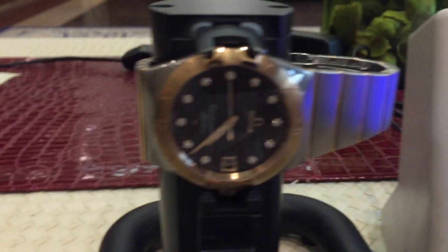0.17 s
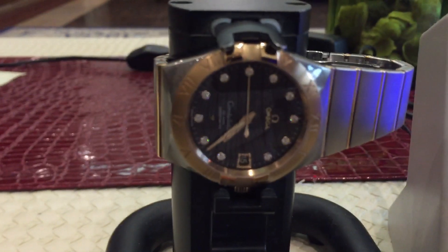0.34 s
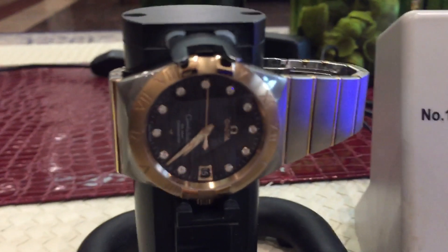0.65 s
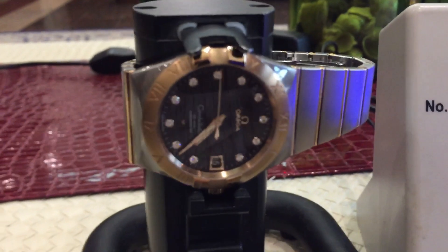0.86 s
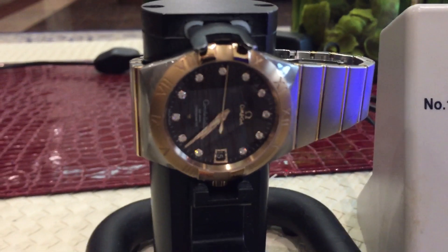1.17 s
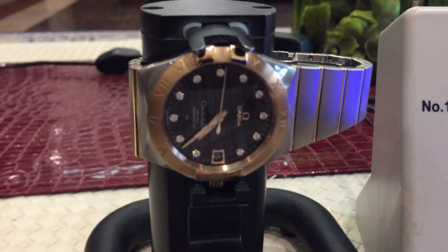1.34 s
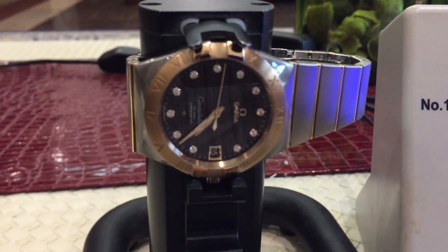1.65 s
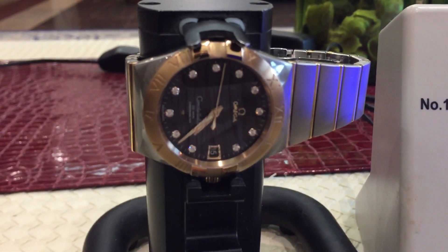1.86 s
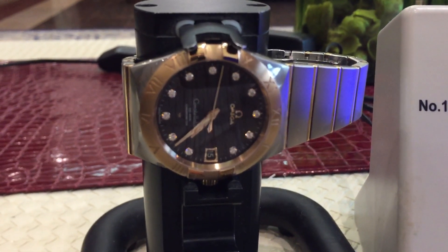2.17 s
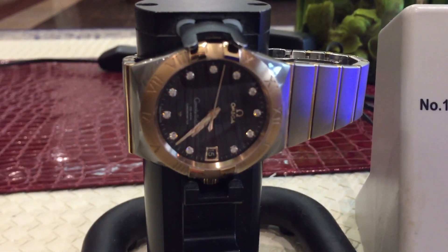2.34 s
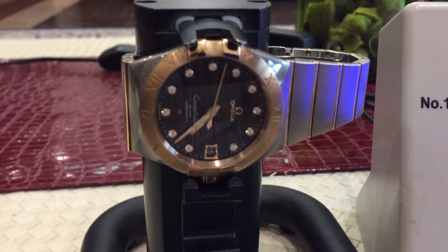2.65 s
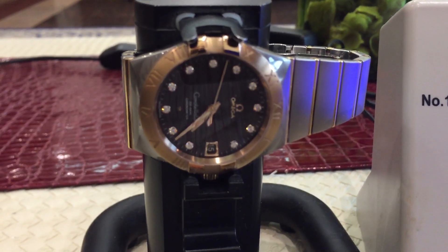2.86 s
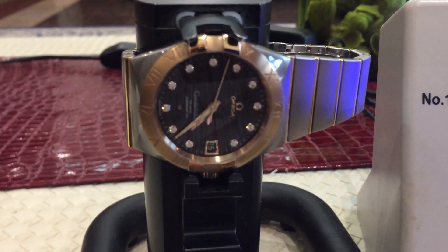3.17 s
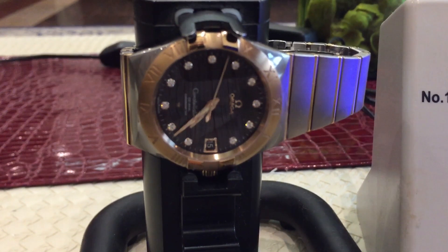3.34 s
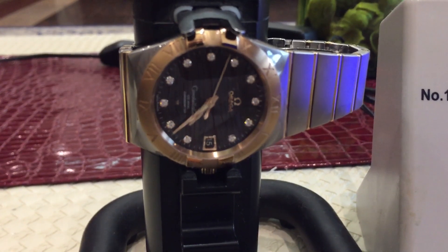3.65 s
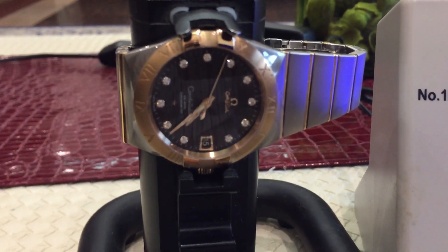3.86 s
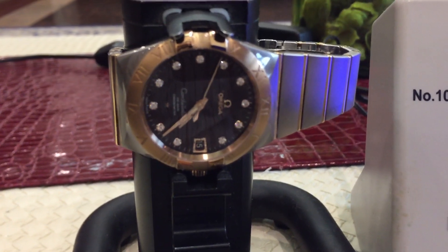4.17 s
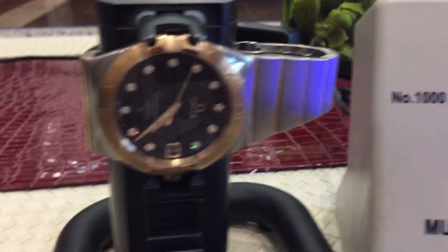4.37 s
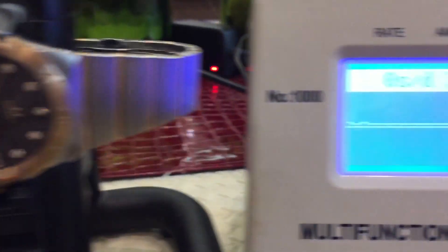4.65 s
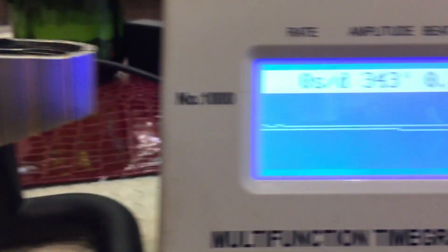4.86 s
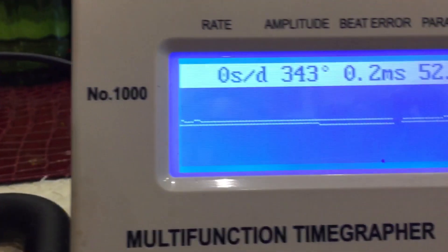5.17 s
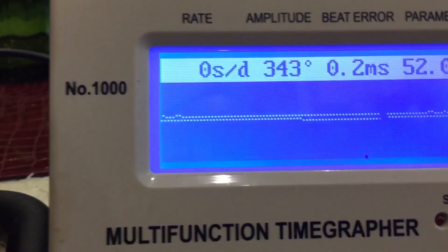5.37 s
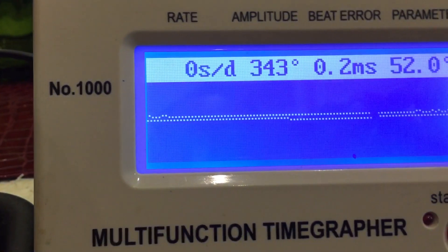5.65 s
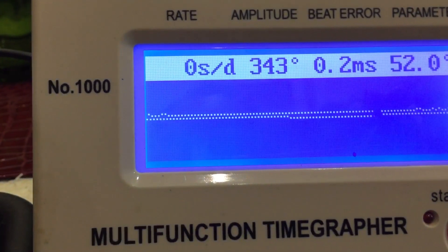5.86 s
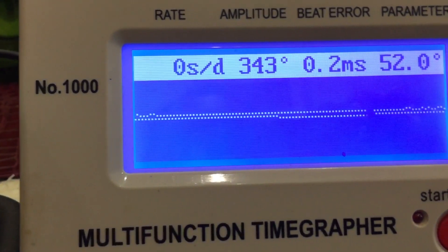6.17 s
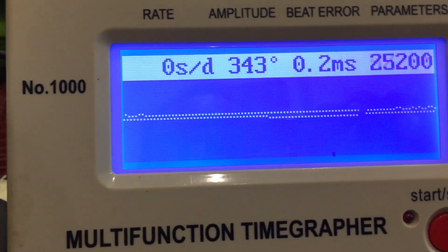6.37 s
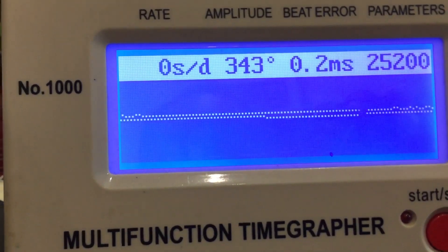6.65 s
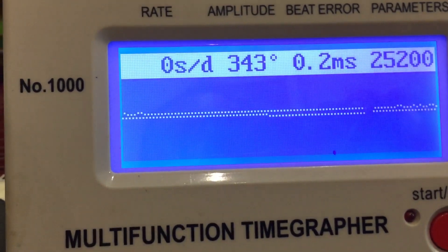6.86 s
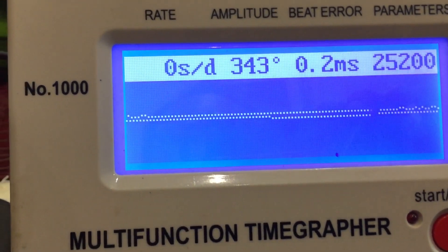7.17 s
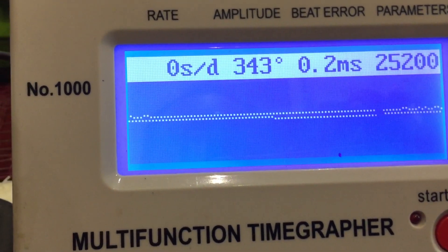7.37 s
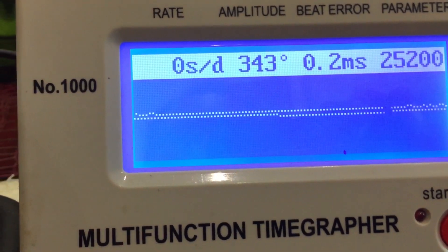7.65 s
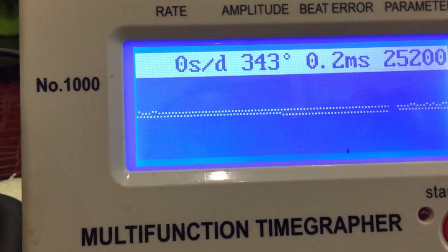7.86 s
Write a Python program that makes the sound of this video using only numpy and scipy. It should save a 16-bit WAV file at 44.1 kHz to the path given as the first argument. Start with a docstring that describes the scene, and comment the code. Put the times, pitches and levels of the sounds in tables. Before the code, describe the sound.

From the start to about 8 seconds, a small timing machine clicks seven times a second, mechanically even and never pausing. Each click is a short, dry, pitched plastic tock centred near two kilohertz, ringing for a few hundredths of a second, with a light treble snap, quick desk reflections and a faint small-room tail. Some fifteen milliseconds before each, a wristwatch gives a minute, thin, very high double tick, alternately stronger and weaker. Beneath lies quiet, wavering mains hum near 100 and 200 hertz, low appliance rumble and soft broad noise. The first second's clicks are slightly louder and hollower, then settle. Dull finger taps fall around 0.6, 4.0, 4.35 and 5.75 seconds, mostly very faint. Between 4.5 and 5.1 the close phone swings to the machine's front: clicks dip slightly, then change colour, with more upper detail, while the watch fades. The steady pulse continues to the end.

```python
"""Mains hum, a low rumble of appliances and broad room noise run throughout: wavering tones and shaped noise.
Seven times a second a wrist watch ticks faintly, and a timing machine answers with a click of its small sounder.
The click is a sum of ringing modes of the plastic case, with scatter off the desk and a small room's tail.
The phone starts beside the machine and settles, its fingers tapping dully now and then; after four seconds
it swings to the front, so the click changes colour and the watch fades."""
import sys
import numpy as np
from scipy import signal
from scipy.fft import rfft, irfft
from scipy.io import wavfile
from scipy.ndimage import uniform_filter1d

SR = 44100
rng = np.random.default_rng(int(sys.argv[2]) if len(sys.argv) > 2 else 0)


def output_pcm(signal):
    """Save a mono or channel-first signal as 16-bit PCM at the path in sys.argv[1].

    Samples are clipped to [-1, 1] before scaling.
    """
    pcm = np.clip(np.atleast_2d(signal).T, -1, 1) * 32767
    wavfile.write(sys.argv[1], SR, np.round(pcm).astype(np.int16))


N = 353241
T = np.arange(N) / SR

BEAT_S, FIRST_S, LIMP_S, POLL_HZ = 1 / 7, .0486, .00027, 4800  # LIMP_S: lateness of every other beat
# the phone's swing from beside the machine to its front
SWING_START_S, SWING_END_S = 4.46, 5.1
SIDE_DB, PASSING_DB, FRONT_DB = 0, -1, -0.15  # click gain: beside, extra in mid-swing, in front
# the phone starts a little closer, and one band of the click is hollowed out until it has settled
SETTLED_S, SETTLING_DB = .95, 1.5
HOLLOW, HOLLOW_LOW_HZ, HOLLOW_HIGH_HZ = .6, 2150, 2600  # HOLLOW: strength of the cut at the start
TREBLE_HZ, TREBLE_LIFT_DB, TREBLE_SCATTER_DB = 5750, 2.5, 0.5  # scatter: spread from beat to beat
ROUNDING = 1.2  # above 1, a mode's decay steepens with time
SNAP_T60_S, SNAP_RISE_S = .015, .002
ROOM_T60_S, ROOM_GAP_S, ROOM_DB, ROOM_DULL_HZ = .38, .012, -29, 2510
CLUTTER_T60_S, CLUTTER_DB = .03, -17
FRESH_SHARE = .3  # share of the reflections' power that is drawn anew for each beat
WATCH_T60_S, WATCH_RISE_S = .012, .0003
WEAK_SWING_DB, WATCH_FAR_DB, WATCH_SCATTER_DB = -4, -9, 2.5  # every other swing; phone in front; spread
AIR_DB = -50  # rms of the broad noise
TOP_HZ = 15900


def undb(db):
    """Decibels to an amplitude factor."""
    return 10 ** (np.asarray(db) / 20)


def level(x, db):
    """Scale a sound to an rms level in dB."""
    return x * undb(db) / np.sqrt(np.mean(x ** 2))


def walk(rate):
    """Random levels held 1 / rate s and slewed twice; spread near 1."""
    k = int(SR / rate)
    held = np.repeat(rng.standard_normal(N // k + 1), k)
    return 1.3 * uniform_filter1d(uniform_filter1d(held, k), k)[:N]


def coloured(gain):
    """Noise shaped by a gain for each frequency."""
    hz = np.arange(N // 2 + 1) * SR / N + 1  # 1 Hz up, so that a logarithm is safe
    return irfft(rfft(rng.standard_normal(N)) * gain(hz), N)


def add(out, s, sound):
    """Mix a sound in at s seconds, cut off at the end."""
    i = int(round(s * SR))
    out[i:i + len(sound)] += sound[:N - i]


def decay(t, t60):
    """Exponential fade reaching -60 dB after t60 seconds."""
    return np.exp(-np.log(1000) * t / t60)


def ring(hz, t60, db, rise, sign):
    """Modes that build up and die away, summed."""
    t = T[:SR // 16, None]
    shape = (1 - np.exp(-t / rise)) ** 2 * np.exp(-np.log(1000) * (t / t60) ** ROUNDING)
    return (shape * np.sin(2 * np.pi * hz * t)) @ (sign * undb(db))


def beats():
    """Time of each click, and how far the phone has got through its swing (0-1)."""
    beat = np.arange(int(N / SR / BEAT_S))
    # every other swing of the balance comes late, and the machine answers at the nearest poll
    times = FIRST_S + beat * BEAT_S + beat % 2 * LIMP_S
    times = np.round(times * POLL_HZ) / POLL_HZ
    return times, np.clip((times - SWING_START_S) / (SWING_END_S - SWING_START_S), 0, 1)


def hum():
    """Mains-locked tones and a motor tone just under one of them, so the pair throbs; each wavers a little."""
    # tones: pitch_hz, level_db (rms before wavering), waver_db
    hum_tones = [(99.95, -50.5, 2.5), (199.9, -43, .9), (291, -64.5, 2.5), (299.9, -67, 2.5),
                 (399.8, -72, 3.5), (499.7, -82, 4), (599.7, -87, 4)]
    out = np.zeros(N)
    for hz, db, waver_db in hum_tones:
        tone = np.sin(2 * np.pi * (hz * T + rng.random()))
        out += np.sqrt(2) * undb(db + waver_db * walk(6.6)) * tone
    return out


def air():
    """Broad room noise in bands that swell on their own, with a few soft low resonances of appliances."""
    # spectrum of the broad noise: pitch_hz, level_db (per Hz, relative)
    air_curve = [(15, -48), (25, -40), (60, -6.5), (95, 1.5), (145, -3.5), (230, -9), (330, -14.5),
                 (451, -21), (760, -30), (1400, -33.5), (2000, -36), (3250, -39), (5880, -42.5),
                 (9300, -47.5), (10400, -49.5), (11600, -47), (13500, -50), (16000, -52)]
    # low resonances: pitch_hz, width_hz (at half amplitude), level_db (rms before swelling)
    rumble_bands = [(63, 9.9, -62), (123.3, 28, -60.5), (157.4, 17, -63.5), (291, 52, -64),
                    (490, 26, -77.5), (634, 76, -76.5)]
    hz, db = np.transpose(air_curve)
    broad = np.zeros(N)
    for lo, hi in ((0, 250), (250, 450), (450, 800), (800, SR)):
        band = coloured(lambda f: undb(np.interp(np.log(f), np.log(hz), db)) * (f >= lo) * (f < hi))
        swell_db = 1.5 if hi < SR else .4
        broad += band * undb(swell_db * walk(4))
    rumble = np.zeros(N)
    for centre, width, rms_db in rumble_bands:
        band = coloured(lambda f: 1 / (1 + (2 * (f - centre) / width) ** 2))
        rumble += level(band, rms_db) * undb(3.6 * walk(9))
    return level(broad, AIR_DB) + rumble


def watch():
    """Escapement impacts ring thin high case modes, strong and weak by turns, fading as the phone leaves."""
    # impacts just before the machine answers: ahead_s (of the click), level_db (on a strong swing)
    impacts = [(.0165, -68), (.0137, -71)]
    # modes of the watch case: pitch_hz, level_db (added to the impact's)
    watch_modes = [(12200, -7), (13000, -4), (14600, -3), (15100, -2)]
    times, way = beats()
    hz, mode_db = np.transpose(watch_modes)
    out = np.zeros(N)
    for k, at in enumerate(times):
        swing_db = WEAK_SWING_DB * (1 - k % 2) + WATCH_FAR_DB * way[k]
        for ahead, impact_db in impacts:
            chance = rng.standard_normal((3, len(hz)))  # level, pitch and polarity of each mode
            db = mode_db + impact_db + swing_db + WATCH_SCATTER_DB * chance[0]
            tick = ring(hz + 120 * chance[1], WATCH_T60_S, db, WATCH_RISE_S, np.sign(chance[2]))
            add(out, at - ahead, tick)
    return out


def click(view):
    """The click from the side (0) or front (1): case modes in alternating polarity and a dense treble snap."""
    # case and sounder modes: pitch_hz, side_t60_s, side_level_db, side_rise_s,
    # front_t60_s, front_level_db, front_rise_s
    case_modes = np.array([(1487.0, 0.034, -48.0, 0.0048, 0.025, -44.5, 0.0034),
                           (1764.0, 0.016, -31.3, 0.0049, 0.017, -23.6, 0.005),
                           (1890.0, 0.039, -23.6, 0.005, 0.021, -13.4, 0.0043),
                           (1912.0, 0.008, -67.0, 0.0046, 0.036, -25.6, 0.0015),
                           (2087.0, 0.028, -29.6, 0.005, 0.011, -28.3, 0.0011),
                           (2238.0, 0.037, -36.3, 0.005, 0.023, -23.9, 0.005),
                           (2324.0, 0.02, -30.8, 0.0008, 0.029, -29.3, 0.0012),
                           (2547.0, 0.038, -45.4, 0.0047, 0.024, -38.9, 0.0018),
                           (2680.0, 0.046, -46.7, 0.0007, 0.036, -36.0, 0.0035),
                           (2783.0, 0.025, -45.0, 0.0016, 0.06, -52.7, 0.0005),
                           (3023.0, 0.025, -37.3, 0.0031, 0.024, -42.7, 0.0005),
                           (3314.0, 0.012, -47.8, 0.0047, 0.013, -23.7, 0.005),
                           (3466.0, 0.028, -48.7, 0.0017, 0.008, -47.0, 0.0005),
                           (3689.0, 0.011, -42.1, 0.0008, 0.017, -35.4, 0.0006),
                           (3846.0, 0.028, -36.3, 0.0049, 0.008, -70.0, 0.005),
                           (3962.0, 0.027, -45.8, 0.0005, 0.027, -45.4, 0.0006),
                           (4245.0, 0.012, -25.9, 0.0021, 0.025, -42.3, 0.0006),
                           (4379.0, 0.042, -58.3, 0.0048, 0.012, -17.6, 0.005),
                           (4631.0, 0.021, -39.5, 0.0006, 0.011, -34.9, 0.0006),
                           (4964.0, 0.021, -52.7, 0.0008, 0.024, -54.1, 0.0005),
                           (5246.0, 0.018, -52.9, 0.0005, 0.015, -27.4, 0.005),
                           (5446.0, 0.017, -49.2, 0.0005, 0.008, -30.2, 0.0015),
                           (5939.0, 0.008, -54.2, 0.0015, 0.02, -58.6, 0.001),
                           (6522.0, 0.008, -45.9, 0.0013, 0.032, -68.1, 0.0005),
                           (6851.0, 0.008, -42.9, 0.0013, 0.008, -30.7, 0.0049),
                           (7121.0, 0.009, -28.8, 0.005, 0.008, -70.0, 0.005),
                           (7394.0, 0.008, -70.0, 0.005, 0.011, -36.5, 0.0046),
                           (7635.0, 0.015, -50.8, 0.0012, 0.028, -66.5, 0.0049),
                           (7784.0, 0.009, -70.0, 0.005, 0.017, -57.7, 0.0005)])
    # level contour of the short treble modes: pitch_hz, side_level_db, front_level_db
    snap_curve = np.array([(8600, -64, -55), (8720, -64, -66), (9770, -78, -72), (10480, -64, -62.5),
                           (12000, -61.5, -55.5), (13130, -58.5, -58.5), (13800, -90, -67),
                           (14800, -66, -64), (15370, -74, -79)])
    t60, case_db, rise = case_modes[:, 1 + 3 * view:4 + 3 * view].T
    body = ring(case_modes[:, 0], t60, case_db, rise, (-1.) ** np.arange(len(case_modes)))
    chance = rng.standard_normal((3, 48))  # pitch, level and polarity of each treble mode
    hz = np.linspace(snap_curve[0, 0], snap_curve[-1, 0], num=48) + 50 * chance[0]
    db = np.interp(hz, snap_curve[:, 0], snap_curve[:, 1 + view]) + 2.5 * chance[1]
    return body + ring(hz, SNAP_T60_S, db, SNAP_RISE_S, np.sign(chance[2]))


def room_tail():
    """A diffuse tail that builds after the first walls answer, and quick scatter off things on the desk."""
    t = T[:SR // 3]
    tail = rng.standard_normal(len(t)) * (1 - np.exp(-t / ROOM_GAP_S)) * decay(t, ROOM_T60_S)
    tail = signal.sosfilt(signal.butter(1, ROOM_DULL_HZ, fs=SR, output="sos"), tail)
    scatter = rng.standard_normal(len(t)) * decay(t, CLUTTER_T60_S)
    # each is set to a total energy, as an impulse response
    tail *= undb(ROOM_DB) / np.linalg.norm(tail)
    scatter *= undb(CLUTTER_DB) / np.linalg.norm(scatter)
    return np.array([tail, scatter])


def clicks():
    """One click on every beat, turning from the side sound to the front sound as the phone moves."""
    side, front, steady = click(0), click(1), room_tail()
    treble = signal.butter(4, TREBLE_HZ, "high", fs=SR, output="sos")
    band = signal.butter(2, (HOLLOW_LOW_HZ, HOLLOW_HIGH_HZ), "band", fs=SR, output="sos")
    times, way = beats()
    facing = np.sin(np.pi / 2 * way) ** 2  # share of the power that comes from the front
    settling = np.cos(np.pi / 2 * np.clip(times / SETTLED_S, 0, 1))
    gain_db = SIDE_DB + (FRONT_DB - SIDE_DB) * facing
    gain_db = gain_db + PASSING_DB * np.sin(np.pi * way) + SETTLING_DB * settling
    lift_db = TREBLE_LIFT_DB + TREBLE_SCATTER_DB * rng.standard_normal(len(times))
    out = np.zeros(N)
    for at, share, hollow, db, lift in zip(times, facing, HOLLOW * settling, gain_db, lift_db):
        heard = undb(db) * (np.sqrt(1 - share) * side + np.sqrt(share) * front)
        heard = heard - hollow * signal.sosfiltfilt(band, heard)
        # each beat's reflections mix a steady part with a freshly drawn part
        tail, scatter = np.sqrt(1 - FRESH_SHARE) * steady + np.sqrt(FRESH_SHARE) * room_tail()
        add(out, at, signal.fftconvolve(front, tail))  # the walls are fed by the front wherever the phone is
        add(out, at, signal.fftconvolve(heard, scatter))
        add(out, at, heard + (undb(lift) - 1) * signal.sosfiltfilt(treble, heard))
    return out


def knocks():
    """Dull short taps of fingers on the phone: two low tones that die at once."""
    # faint handling taps: start_s, level_db (of the upper tone before its decay)
    taps = [(.56, -51), (4.0, -60), (4.35, -55), (5.75, -57)]
    t = T[:SR // 20]
    tones = np.sin(2 * np.pi * 850 * t) + 1.1 * np.sin(2 * np.pi * 620 * t)
    out = np.zeros(N)
    for s, db in taps:
        add(out, s, undb(db) * decay(t, 0.026) * tones)
    return out


def scene():
    """All layers summed to one channel."""
    return (hum() + air() + watch() + clicks() + knocks())[None]


def record(dry):
    """The phone cuts the top with a steep low-pass."""
    return signal.sosfilt(signal.ellip(10, .2, 60, TOP_HZ, fs=SR, output="sos"), dry)


dry = scene()
out = record(dry)
output_pcm(out)
```